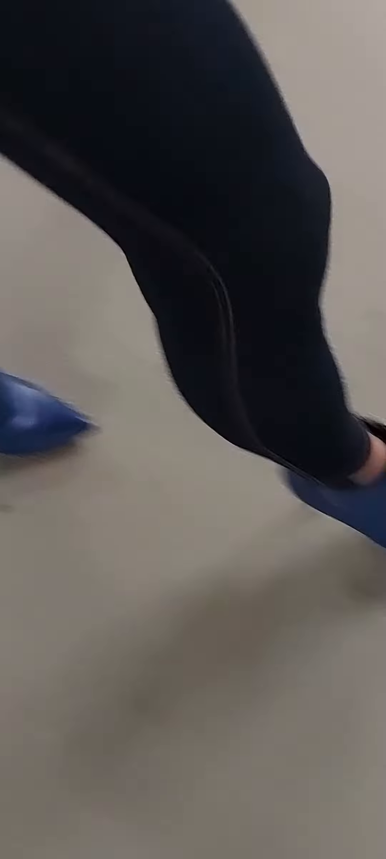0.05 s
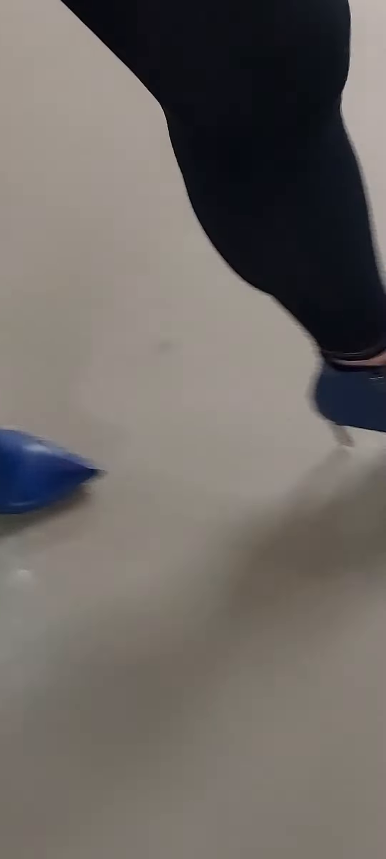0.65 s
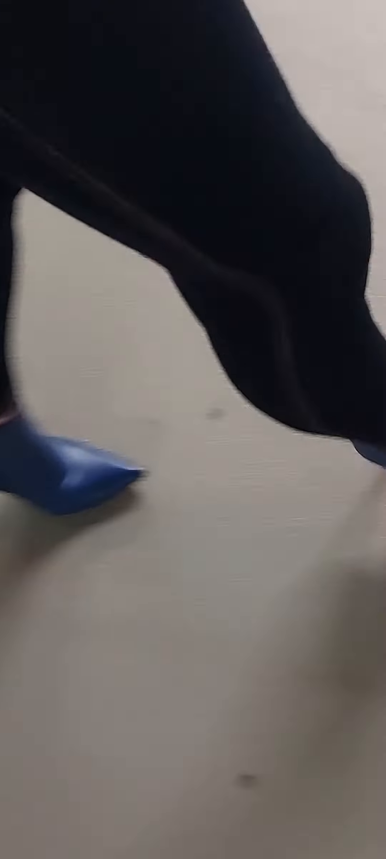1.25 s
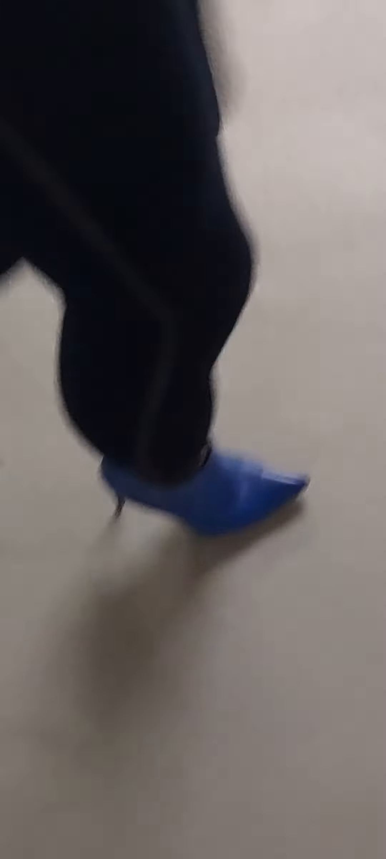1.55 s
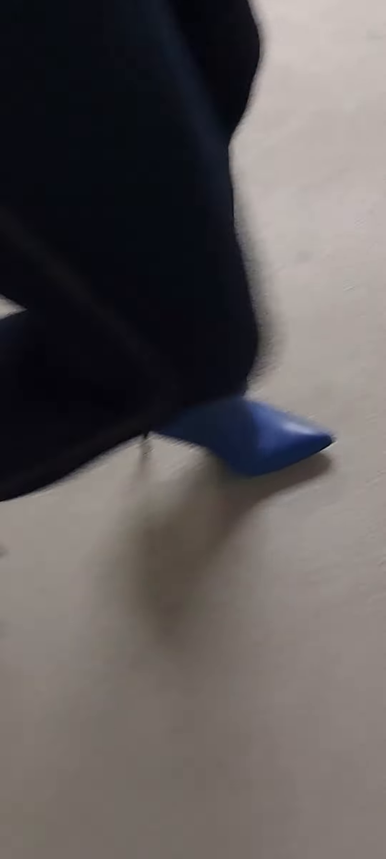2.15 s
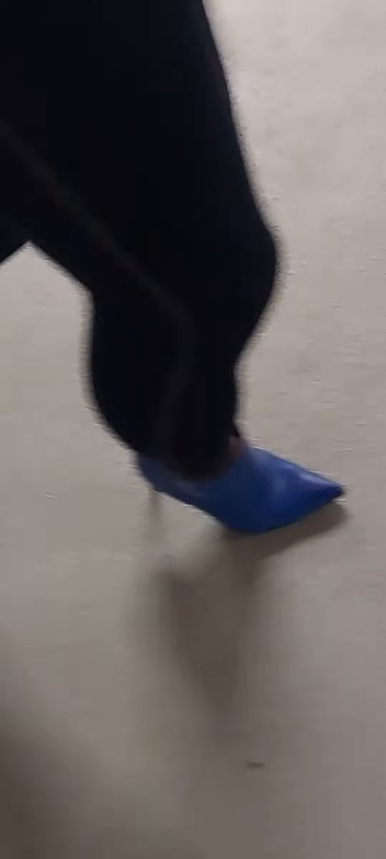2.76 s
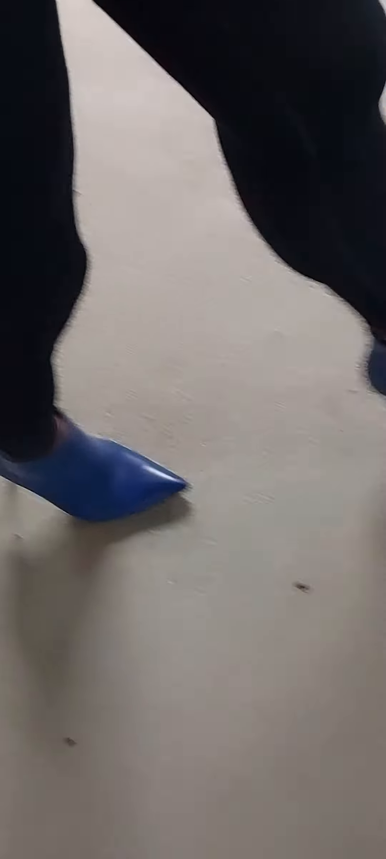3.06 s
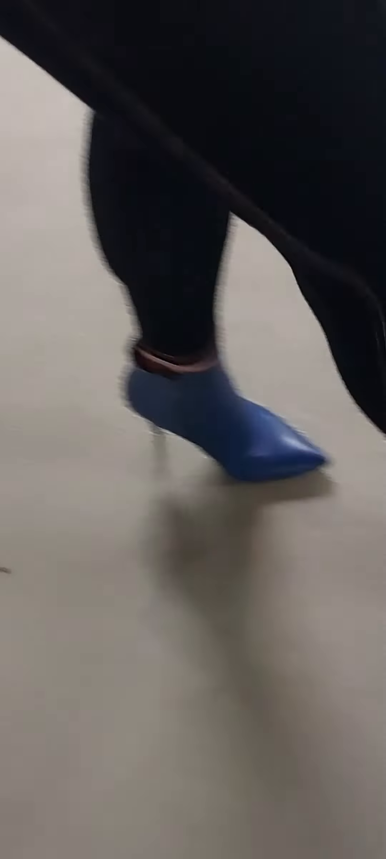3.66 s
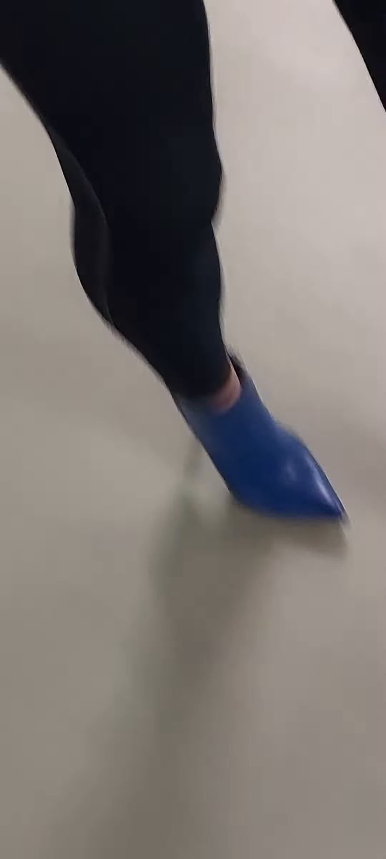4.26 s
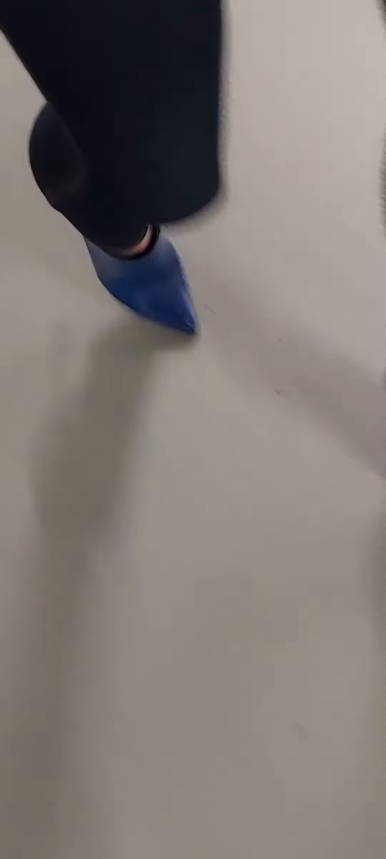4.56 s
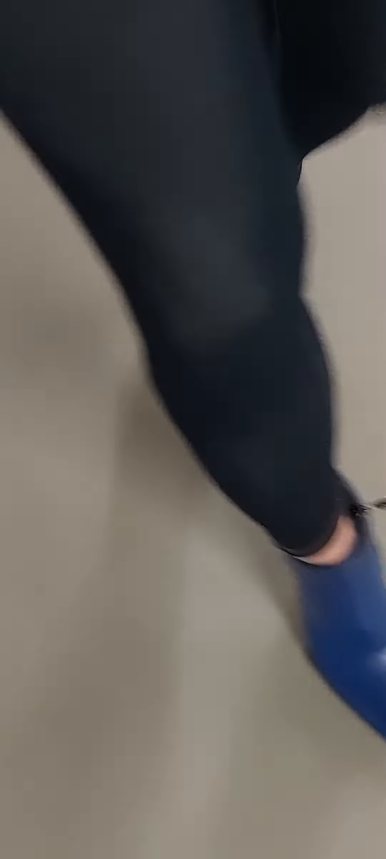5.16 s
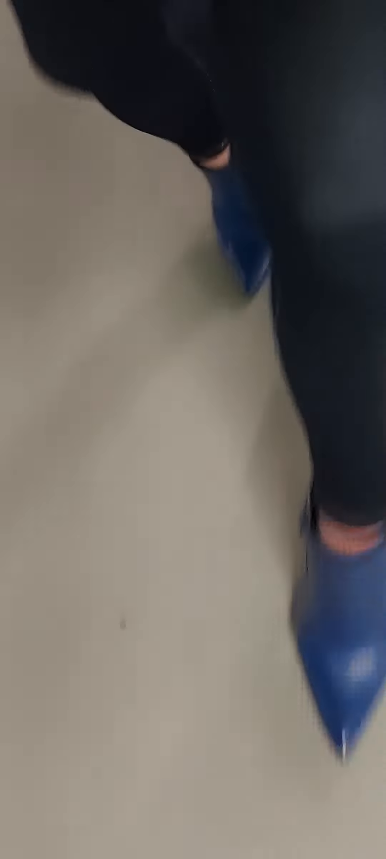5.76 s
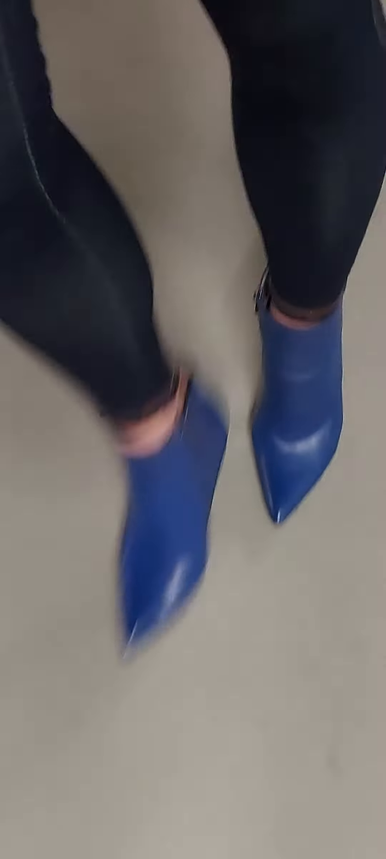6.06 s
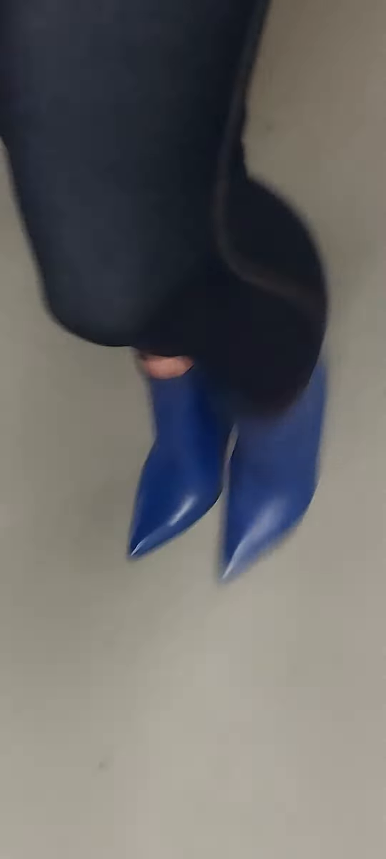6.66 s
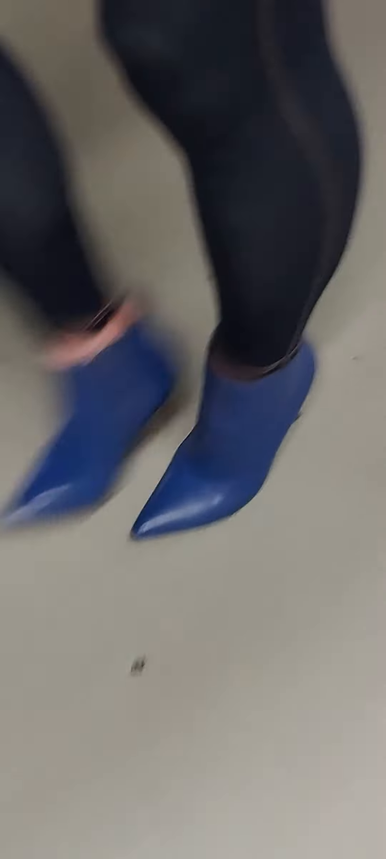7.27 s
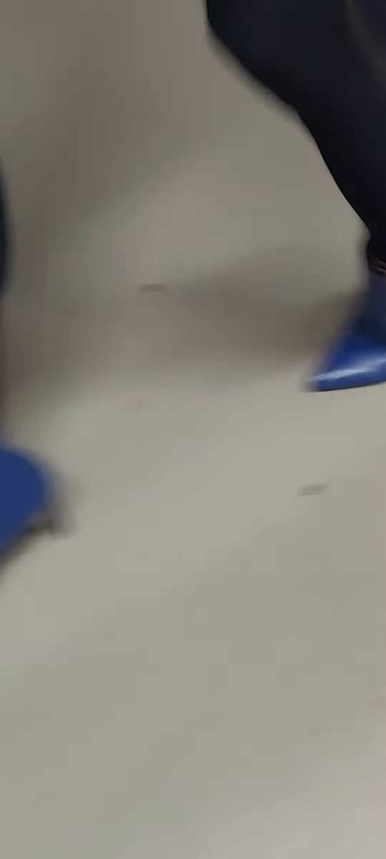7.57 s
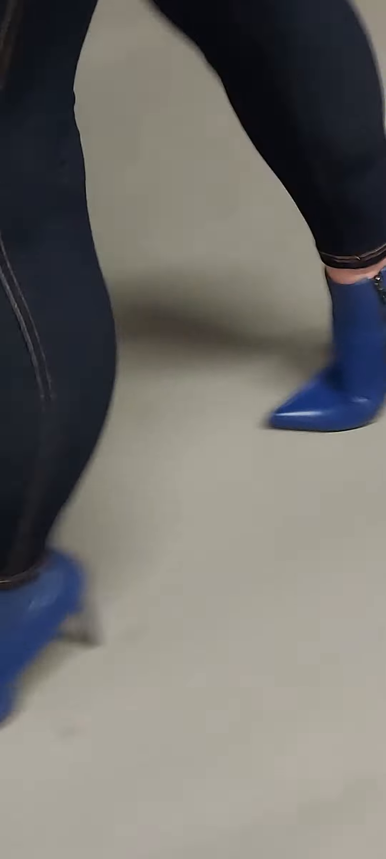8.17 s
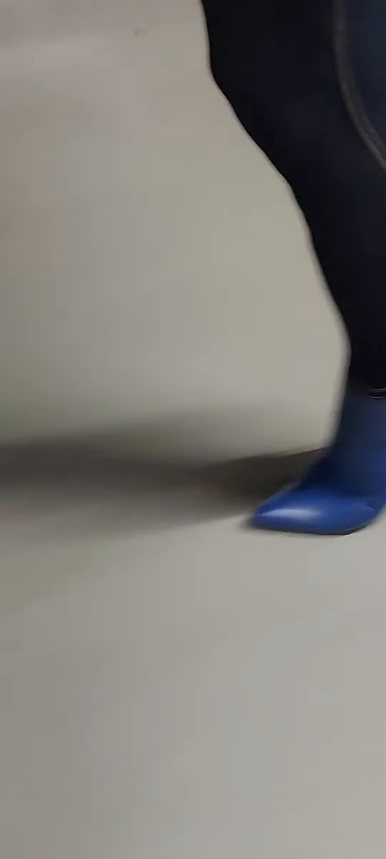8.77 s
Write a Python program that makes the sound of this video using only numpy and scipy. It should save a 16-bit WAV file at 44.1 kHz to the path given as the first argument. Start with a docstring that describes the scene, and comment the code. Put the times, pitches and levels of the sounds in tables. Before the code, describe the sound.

Stiletto boots click steadily across the concrete floor of a large echoing hall, with light scuffs and faint ventilation rumble.

```python
"""Stiletto ankle boots walk steadily over the concrete floor of a large bare hall, microphone alongside.
Each step is a heel click and a sole slap, answered by a ceiling echo, a floor-to-ceiling flutter
and a long tail; heel tips scuff, the thin heels ring and one step lands with a gritty crack.
Boots and trousers creak and rustle, a zip pull tinkles.
Air bumps the microphone, a soft hiss swells once and ventilation rumbles."""
import sys
import numpy as np
from scipy import signal
from scipy.io import wavfile

SR = 44100
rng = np.random.default_rng(int(sys.argv[2]) if len(sys.argv) > 2 else 0)


def pcm_store(signal):
    """Save signal as 16-bit PCM."""
    levels = np.round(np.clip(np.atleast_2d(signal), -1, 1) * 32767)
    wavfile.write(sys.argv[1], SR, levels.astype(np.int16).T)


N = 397341
TIME = np.arange(N) / SR

# boot meets floor: t/s, heel blow/dB, sole blow/dB, hardness/dB, pitch/semitones, hall send/dB
FLOOR_CONTACTS = [(0.13, -2, -5.0, -3.5, 3.5, -0.0), (0.6895, -5.5, -19, 13, -2.5, 1.5),
                  (0.771, -35, -5.5, 2.5, -1, -2.5), (1.3846, -7.5, -6, -6, 6.5, -1),
                  (1.4165, -10.5, -27, 20, 1.5, 1.5), (1.9816, -3.5, -6.0, -4, 4, -1.5),
                  (2.5953, -4.5, -8, -16, 9.5, 7.5), (2.6142, -5.5, -3, 9.5, 6, -3),
                  (3.1163, -9.5, -30, 12, -0.5, -1), (3.2116, 0.5, -4, -3.5, 2, -3),
                  (3.73, -11.5, -20.5, 6.5, 2.0, 3.5), (3.815, -5, -6.5, -7, 1, 6.5),
                  (3.8366, -13, -4, 0, -1, -7), (4.45, -9.0, -4.5, -8, -1.5, -1),
                  (5.0807, -4.5, -3.0, -10.5, 0, -1), (5.6384, -5.5, -35, 5, -2, 3),
                  (5.6959, -10, -3, -3, -5, -7), (6.3355, -13.5, -27, 14, 9.5, -1.5),
                  (6.3434, -3, -9.5, 0, 0.0, -1), (6.9756, -6.5, -3.5, -5.0, 1.5, 0),
                  (7.565, -1.5, -3.5, -8.5, 1.5, -1.5), (8.1547, -15.5, -29, 17, -0.5, 1),
                  (8.1725, -12.5, -13, 11.5, 3.5, -2.5), (8.768, -18, -14.5, 1.5, 3.5, 0.5),
                  (8.8084, -3, -6.5, -1.0, 0.5, -3)]
# modes of the heel shaft: f/Hz, level/dB, t60/s
SHAFT_MODES = [(1557, 7, 0.021), (1933, 0.5, 0.026), (4150, -20.5, 0.048)]


def footsteps(grit_s=0.002, left_lag_s=0.000092, pan_db=.5, hall_hardness=0.75):
    """Heel and sole drive the boot with an impulse plus crushed grit; returns near sound and hall send."""
    # thump, knock, clack, snap, crack: low/Hz, high/Hz, contact cut-off/Hz, grit share,
    # heel gain/dB, sole gain/dB, hardness share, pitch share
    voices = [(197, 407, 4100, 0.046, -24, 1, 0, 0.078), (536, 1028, 1320, 0.42, -1, -29, 0.033, 0.25),
              (1076, 1916, 3460, 1.1, -15.5, -9, 0.87, 0.58),
              (2790, 4870, 8300, 0.91, -37.5, -22.5, 0.83, 0.19),
              (5250, 40000, 13400, 1.6, -33.5, -26.5, 0.63, 0.82)]
    near, sent = np.zeros((2, N)), np.zeros(N)
    t = np.arange(SR // 25) / SR
    impulse = 1. * (t == 0)
    for s, heel_db, sole_db, hard_db, semitones, send_db in FLOOR_CONTACTS:
        grit = unit_energy(rng.standard_normal((len(voices), 2, len(t))) * np.exp(-t / grit_s))
        for k, row in enumerate(voices):
            low_hz, high_hz, cut_hz, grit_share, by_heel_db, by_sole_db, hard_share, pitch_share = row
            blow = np.hypot(from_db(heel_db + by_heel_db), from_db(sole_db + by_sole_db))
            lift_db = hard_db * hard_share
            pitch = 2 ** (semitones * pitch_share / 12)
            force = np.vstack([impulse + grit_share * grit[k], impulse])   # no grit into the hall
            voice = filtered(force, [pitch * low_hz, pitch * high_hz], "band")
            voice = filtered(voice, pitch * cut_hz, "low", order=4)
            polarity = -(-1) ** k
            left, right, outward = polarity * blow * unit_energy(voice)
            add(near[0], s + left_lag_s, left * from_db(lift_db - pan_db))
            add(near[1], s, right * from_db(lift_db + pan_db))
            add(sent, s, outward * from_db(send_db + hall_hardness * lift_db))
    return near, sent


def heel_ring(by_heel_db=-29, by_sole_db=-22):
    """The heel shaft rings louder under a stronger, harder blow."""
    out, shaft = np.zeros(N), unit_energy(ring(SHAFT_MODES))
    for s, heel_db, sole_db, hard_db, *_ in FLOOR_CONTACTS:
        blow = np.hypot(from_db(heel_db + by_heel_db), from_db(sole_db + by_sole_db))
        add(out, s, blow * from_db(hard_db) * shaft)
    return out


def scuffs(band_hz=(400, 1200), sand_db=-24, sand_cut_hz=4200, shaft_db=-22):
    """A heel tip drags: a dull rasp that stirs the shaft, with a little sand on top."""
    # skids: t/s, level/dB, decay/s
    skids = [(0.088, -33.5, 0.009), (0.714, -35.5, 0.018), (1.284, -44, 0.011), (1.925, -46.5, .008),
             (2.469, -49.5, 0.0038), (4.408, -41.5, 0.023), (4.97, -42, 0.0045), (5.657, -38.5, 0.03),
             (6.332, -29.5, 0.0081), (6.92, -33, 0.0037), (7.463, -40, 0.0039)]
    out, t = np.zeros(N), np.arange(SR // 12) / SR
    shaft = unit_energy(ring(SHAFT_MODES))
    for s, db, decay_s in skids:
        drag = rng.standard_normal(len(t)) * np.exp(-t / decay_s)
        sand = from_db(sand_db) * filtered(drag, sand_cut_hz, "low")
        stirred = from_db(shaft_db) * signal.fftconvolve(drag, shaft)[:len(t)]
        rasp = filtered(drag, band_hz, "band") + sand + stirred
        add(out, s, from_db(db) * rasp / np.abs(rasp).max())
    return out


def radiation_dip(x, band_hz=(2250, 3000), depth=0.19):
    """The boot radiates weakly just above its clack."""
    return x - depth * filtered(x, band_hz, "band", order=1)


def ceiling(near, echo_s=.0123, echo_db=-10.5, trip_hz=52.4, flutter_db=-17.5, flutter_t60_s=1.0):
    """One echo from above, then a dull flutter of round trips between floor and ceiling."""
    sway_s = .0004 * np.cos(2 * np.pi * .6 * TIME)   # the carried microphone sways in height
    overhead = np.array([np.interp(TIME - echo_s + sway_s, TIME, side) for side in near])
    trips_s = np.arange(1, 50) / trip_hz
    bounces = np.zeros(2 * SR)
    bounces[(trips_s * SR).astype(int)] = from_db(flutter_db - 60 * trips_s / flutter_t60_s)
    flutter = signal.fftconvolve(near + overhead, bounces[None], axes=1)[:, :N]
    return from_db(echo_db) * overhead + filtered(flutter, 1500, "low")


def hall(sent, build_s=0.033, merge_s=0.33, lump_db=4.5):
    """Far-wall reflections arrive in lumps, merge, then die away band by band."""
    # tail spectrum: f/Hz, gain/dB
    tail_gain = [(100, -5.5), (300, -7.5), (700, -4), (1100, -2), (1500, 1.5), (2200, -3.5), (3200, 4.5),
                 (4500, -4.5), (6000, 3), (8000, 3.5), (15000, 1)]
    # tail decay: f/Hz, t60/s
    tail_t60 = [(100, 1.2), (300, 0.8), (800, 1.175), (1700, 1.37), (4000, 1.14), (8000, 0.79),
                (15000, 0.12)]
    t = np.arange(3 * SR // 2) / SR
    lumps = filtered(rng.standard_normal(len(t)), 350, "low")
    lumpy = from_db(lump_db * lumps / np.std(lumps) * np.exp(-t / merge_s))
    build = lumpy * (1 - np.exp(-t / build_s))
    tail = sum(band * unit_energy(build * from_db(-60 * t / at_hz(tail_t60, hz)))
               for hz, band in diffuse_bands(len(t), tail_gain))
    return signal.fftconvolve(sent[None], tail, axes=1)[:, :N]


def creaks_and_floor_crack(top_db=-1, body_db=1, after_db=-13, tick_decay_s=.0019):
    """Crisp ticks: leather creaks and, at 8.17 s, the sharp gritty crack of a boot striking the floor."""
    # creaks and the one floor crack: t/s, level/dB, low-band offset/dB
    ticks = [(0.385, -48.5, 6), (0.8582, -43, -6), (1.5309, -54, 15), (1.6248, -51, 6), (2.0296, -41, 6),
             (2.0475, -42, -15), (2.068, -41, 6), (2.8416, -45.5, 10), (3.254, -47.5, -12),
             (3.3063, -42, -7), (5.3213, -48, 9), (6.3884, -39.5, 3.5), (6.6005, -45.5, 7.5),
             (7.664, -48, -1), (7.7963, -45.5, 3), (8.172, -33.5, -6), (8.431, -48, 4.5),
             (8.8523, -44, -12), (8.885, -35, 3.5)]
    out, t = np.zeros((2, N)), np.arange(SR // 30) / SR
    for s, db, low_db in ticks:
        starts_s = np.r_[0, rng.uniform(.003, .016, 3)]   # one burst, then three weaker ones
        bursts = sum(from_db(after_db * (k > 0)) * (t >= at) * np.exp(-np.abs(t - at) / tick_decay_s)
                     for k, at in enumerate(starts_s))
        tick = from_db(db) * rng.standard_normal((2, len(t))) * bursts
        top = from_db(top_db) * filtered(tick, [5500, 15000], "band")
        body = from_db(body_db + low_db) * filtered(tick, [1800, 5000], "band")
        add(out, s, top + body)
    return out


def rustle(gain_db=-70.5, rise_s=0.094, sharpness=0.74, same_step_s=.3, grain_db=1.5, clump_db=3.5):
    """Leather and cloth rub as the foot takes the weight, catching in clumps of fine grains."""
    # rubbing spectrum: f/Hz, density/dB
    colour = [(2500, -61), (4000, 12), (6500, 13), (9000, 14), (11500, 33), (14000, 33), (16000, -70.5)]
    contacts_s = np.array(FLOOR_CONTACTS)[:, 0]
    landings_s = contacts_s[np.diff(contacts_s, append=np.inf) > same_step_s]   # each step's last contact
    ages = [np.maximum(TIME - s, 0) / rise_s for s in landings_s]
    swell = from_db(gain_db) * sum((age * np.exp(1 - age)) ** sharpness for age in ages)
    grain, clump = (filtered(rng.standard_normal(N), hz, "low") for hz in (300, 35))
    catching = from_db(grain_db * grain / np.std(grain) + clump_db * clump / np.std(clump))
    return swell * catching * filtered(noise(colour), 2500, "high")


def zip_pull():
    """A small metal tab touches its slider and rings."""
    # touches: t/s, level/dB
    touches = [(0.989, -41), (4.318, -56), (8.436, -66)]
    # tab modes: f/Hz, level/dB, t60/s
    tab_modes = [(7400, -5.5, 0.045), (11300, -7, 0.11)]
    out = np.zeros(N)
    for s, db in touches:
        add(out, s, from_db(db) * ring(tab_modes) / 2)
    return out


def air_puffs():
    """Swirls of air push on the microphone ports, mostly the left."""
    # swirls: t/s, left level/dB, Gaussian width/s, left over right/dB
    swirls = [(1.506, -40, 0.0093, 14), (1.657, -35.5, 0.047, 14), (1.876, -45, .06, 22),
              (2.084, -38, 0.076, 13), (2.182, -35, 0.021, 22), (2.31, -39.5, 0.014, 19),
              (2.83, -41, 0.039, 24), (4.011, -36.5, .014, -5), (7.941, -45, 0.013, -3)]
    # buffeting spectrum: f/Hz, density/dB
    colour = [(22, -30), (45, -6), (75, 5.5), (110, -7), (200, -17.5), (500, -24), (2000, -56)]
    push = sum(from_db([[db], [db - pan_db]]) * np.exp(-.5 * ((TIME - s) / width_s) ** 2)
               for s, db, width_s, pan_db in swirls)
    return push * noise(colour)


def hiss(peak_s=4.88, peak_db=-55.5, rise_db_per_s=9, fall_db_per_s=4):
    """A soft hiss comes up quickly mid-hall and fades slowly."""
    # hiss spectrum: f/Hz, density/dB
    colour = [(400, 17.5), (900, 13), (2000, 9.5), (2800, -9), (4200, -5.5), (6500, -20), (16000, -46)]
    since_s = TIME - peak_s
    level_db = peak_db + np.minimum(rise_db_per_s * since_s, -fall_db_per_s * since_s)
    return from_db(level_db) * noise(colour)


def ventilation():
    """Ventilation rumble and microphone hiss, drifting slightly in level."""
    # spectrum: f/Hz, density/dB
    colour = [(22, -29), (40, -4), (62, 6), (90, -2), (150, 1), (210, -10.5), (310, -3), (450, -19),
              (800, -20.5), (1500, -27.5), (3000, -48.5), (6000, -44), (11000, -38), (16000, -52)]
    # drift: t/s, level/dB
    drift = [(0, -51), (1.2, -53), (2.6, -50.5), (5.0, -50), (7.8, -50), (9.01, -52)]
    level_db = np.interp(TIME, *np.transpose(drift))
    return from_db(level_db) * noise(colour)


def diffuse_bands(size, colour):
    """Half-octave bands of coloured noise at two spaced ports; yields (centre/Hz, stereo band)."""
    # diffuse field: f/Hz, left-right correlation
    correlation = [(30, 0.89), (130, 0.97), (290, 0.83), (640, 0.35), (1400, -0.23), (3000, 0.058),
                   (15000, -0.014)]
    edges_hz = 20 * 2 ** np.arange(0, 10.1, .5)
    white = rng.standard_normal((2, 2, size))
    for k, (low, high) in enumerate(zip(edges_hz, edges_hz[1:])):
        if high < colour[0][0] or low > colour[-1][0]:
            continue
        hz = np.sqrt(low * high)
        mid, side = from_db(at_hz(colour, hz)) * filtered(white[k % 2], [low, high], "band")
        alike = np.clip(at_hz(correlation, hz), -1, 1)
        yield hz, np.sqrt((1 + alike) / 2) * mid + np.sqrt((1 - alike) / 2) * side * [[1], [-1]]


def noise(colour):
    """Steady stereo noise of the given spectrum, rms 1."""
    out = sum(band for _, band in diffuse_bands(N, colour))
    return out / np.std(out)


def ring(modes):
    """Decaying modes of a struck part."""
    t = np.arange(SR // 6) / SR
    return sum(from_db(db - 60 * t / t60_s) * np.sin(2 * np.pi * hz * t) for hz, db, t60_s in modes)


def from_db(db):
    return 10 ** (np.asarray(db) / 20)


def unit_energy(x):
    return x / np.sqrt(np.sum(x ** 2, axis=-1, keepdims=True) + 1e-20)


def at_hz(points, hz):
    """Interpolate over log frequency."""
    f, value = np.transpose(points)
    return np.interp(np.log(hz), np.log(f), value)


def filtered(x, hz, kind, order=2):
    """Butterworth filter."""
    sos = signal.butter(order, np.clip(hz, 10, .45 * SR), kind, fs=SR, output="sos")
    return signal.sosfilt(sos, x + 1e-18)


def add(track, s, sound):
    """Mix a sound into a track from time s on."""
    i = max(int(round(s * SR)), 0)
    track[..., i:i + sound.shape[-1]] += sound[..., :max(N - i, 0)]


def scene(heel_send_db=-1):
    """Steps in the hall, small sounds of boots and clothes, and air."""
    near, sent = footsteps()
    heels = scuffs() + heel_ring()
    direct = near + heels
    tail = hall(sent + from_db(heel_send_db) * heels)
    feet = radiation_dip(direct + ceiling(direct) + tail)
    small_sounds = creaks_and_floor_crack() + zip_pull() + rustle()
    air = ventilation() + hiss() + air_puffs()
    return feet + small_sounds + air


def record(dry):
    """Steep low-pass at 16 kHz."""
    return signal.sosfilt(signal.ellip(10, .2, 70, 16000, fs=SR, output="sos"), dry)


dry = scene()
out = record(dry)
pcm_store(out)
```